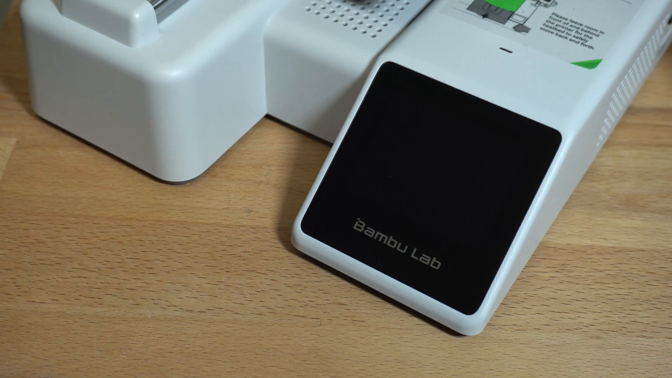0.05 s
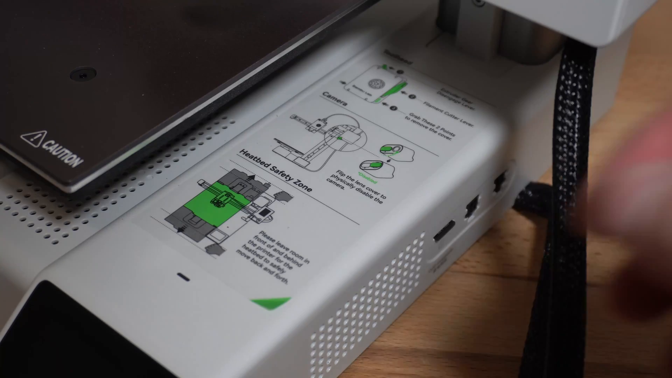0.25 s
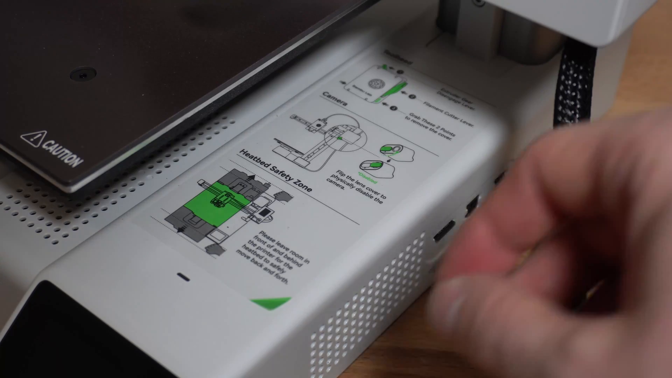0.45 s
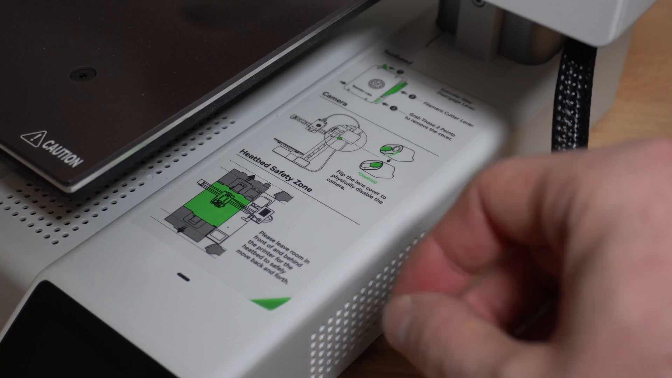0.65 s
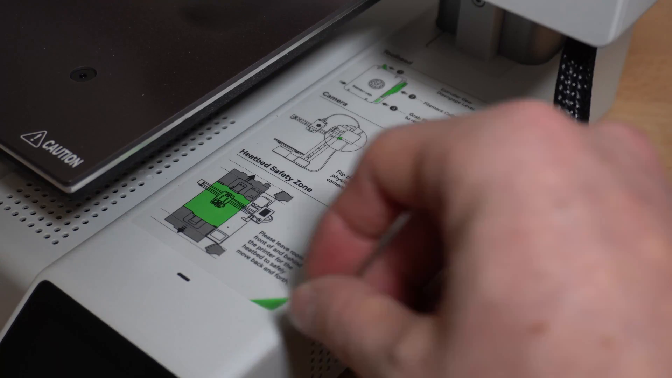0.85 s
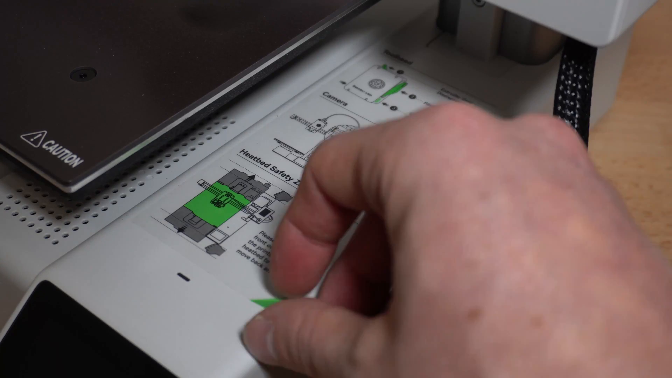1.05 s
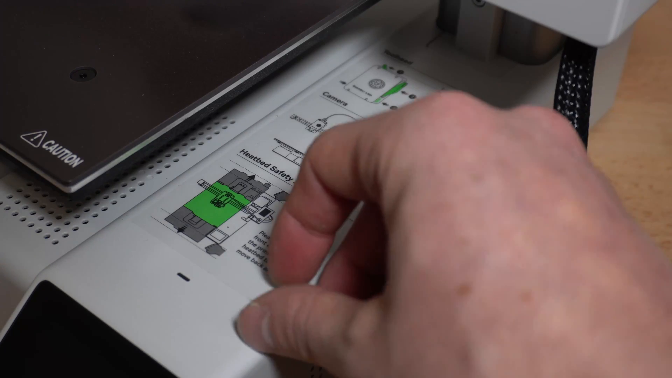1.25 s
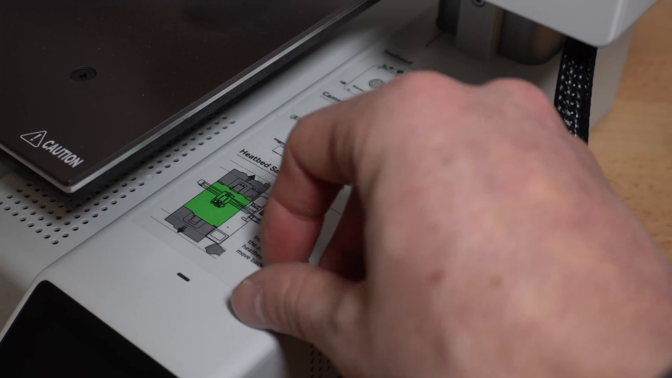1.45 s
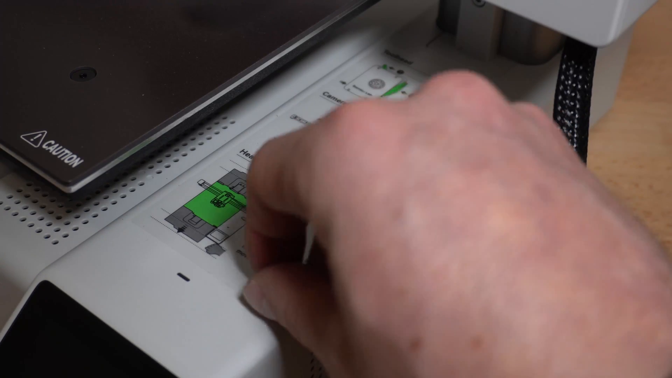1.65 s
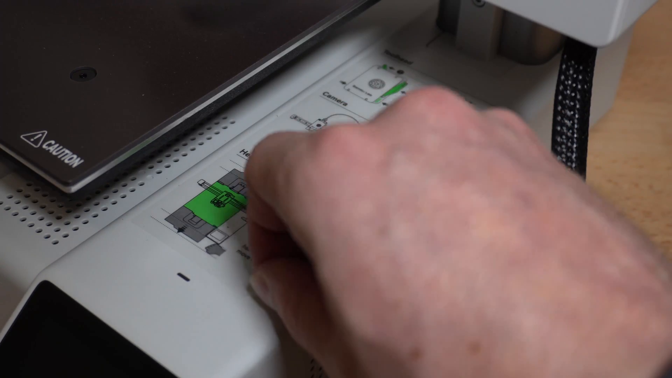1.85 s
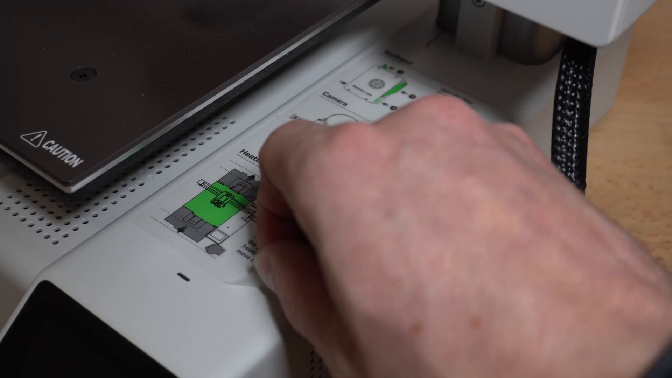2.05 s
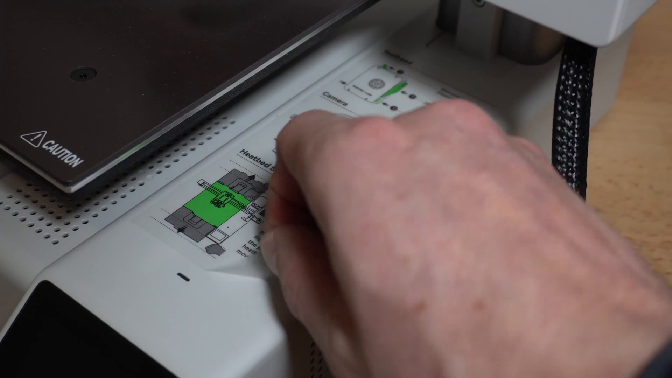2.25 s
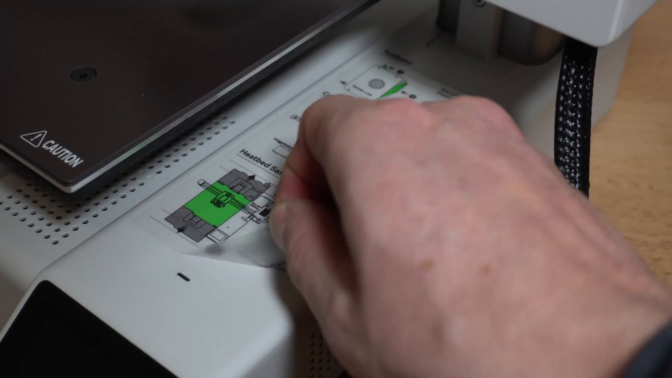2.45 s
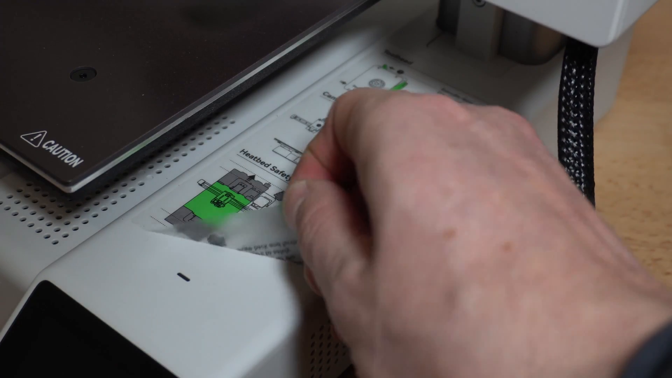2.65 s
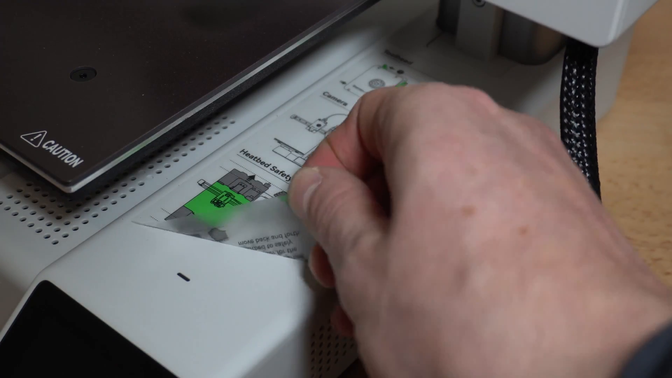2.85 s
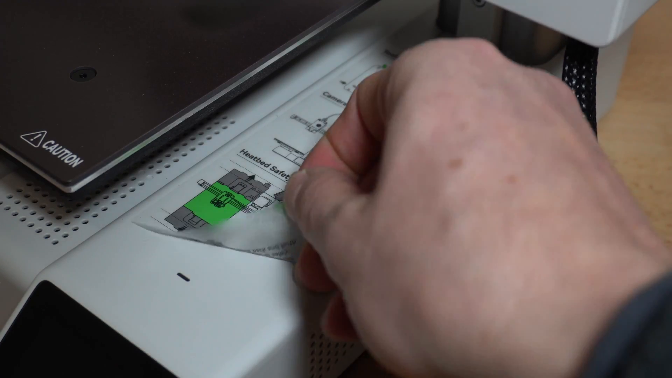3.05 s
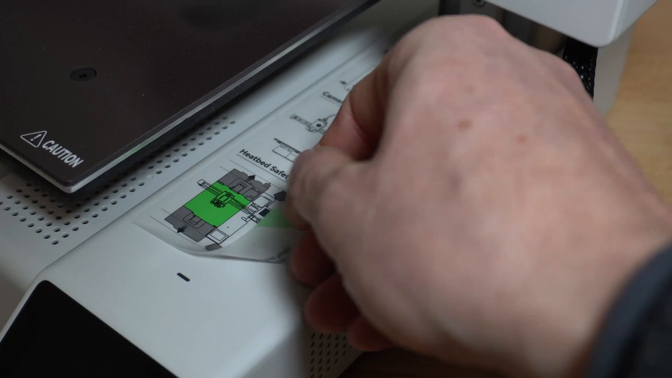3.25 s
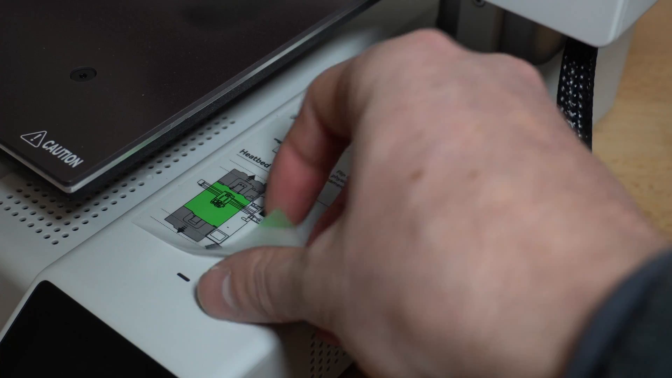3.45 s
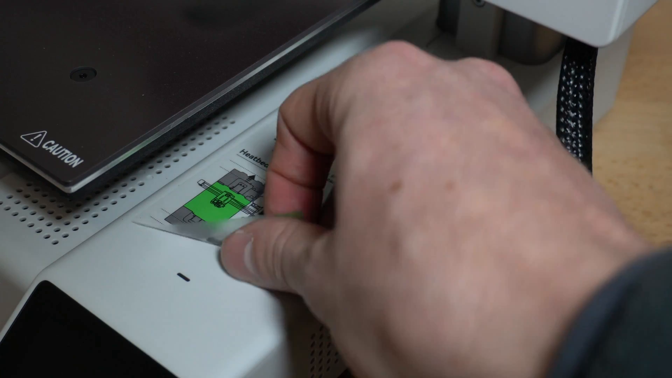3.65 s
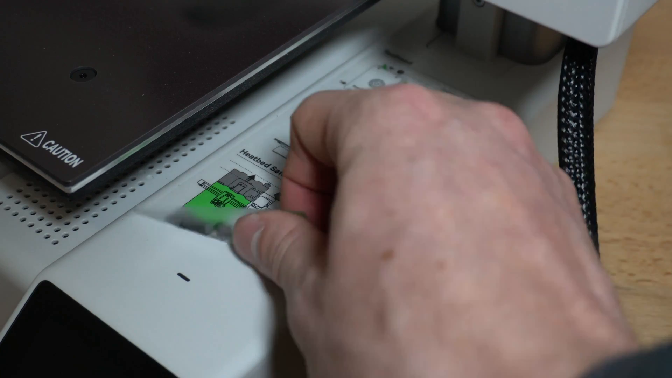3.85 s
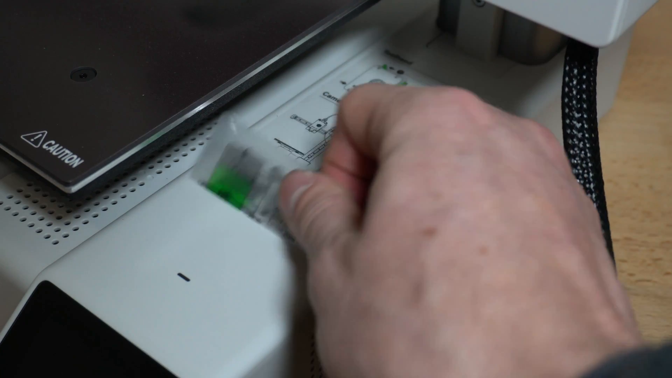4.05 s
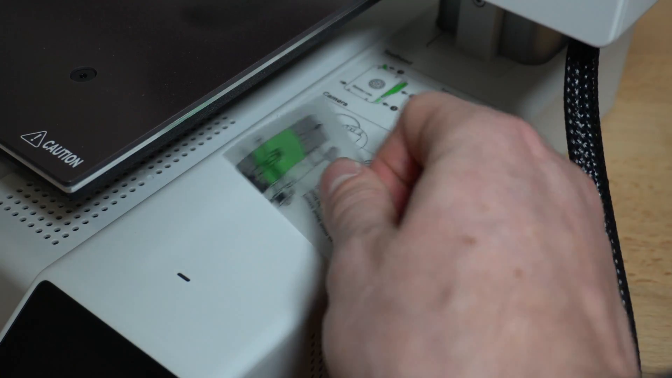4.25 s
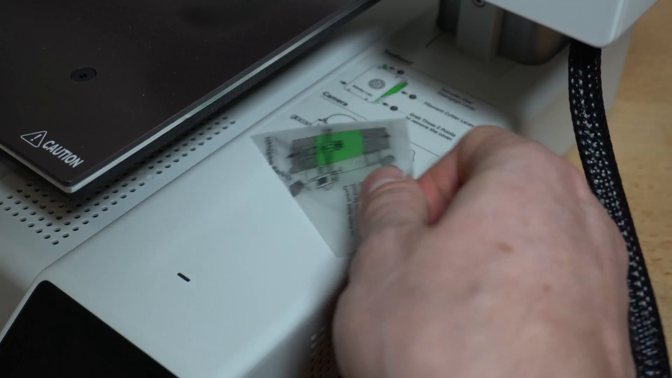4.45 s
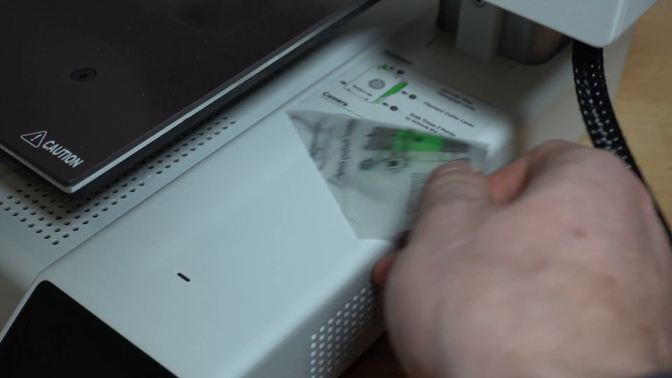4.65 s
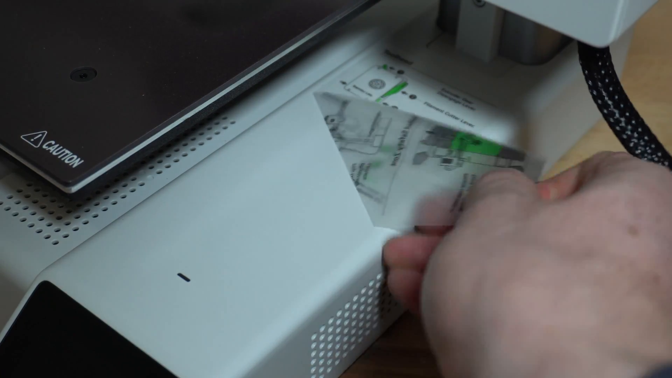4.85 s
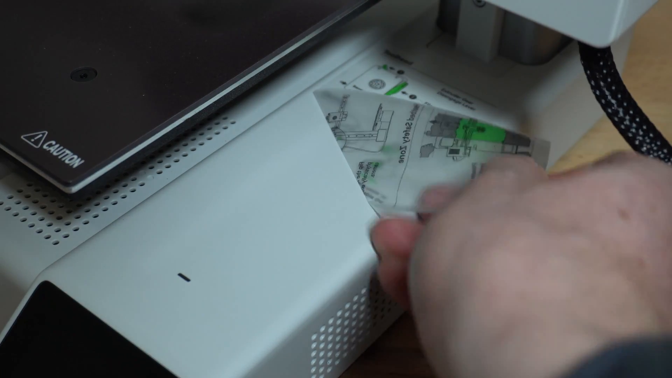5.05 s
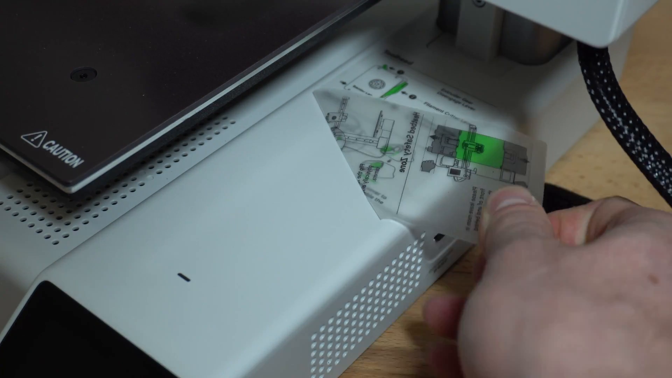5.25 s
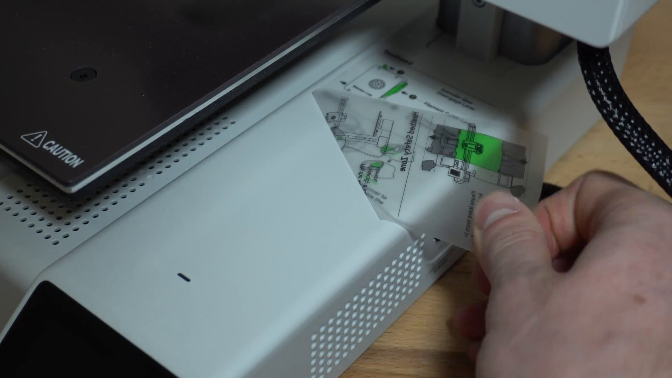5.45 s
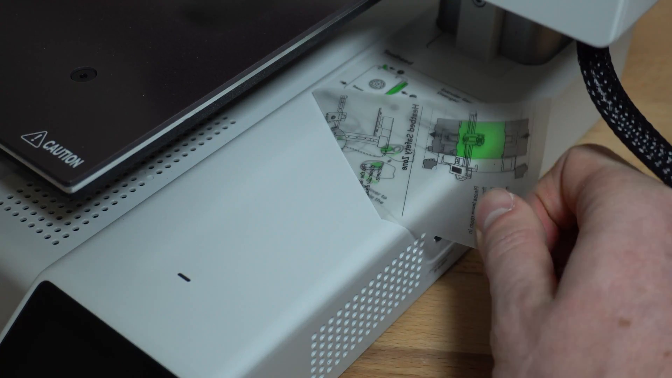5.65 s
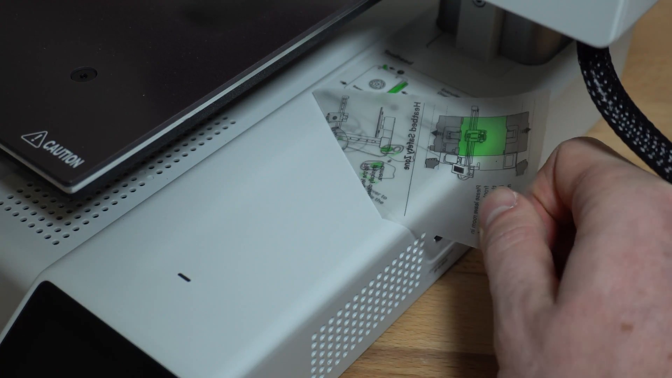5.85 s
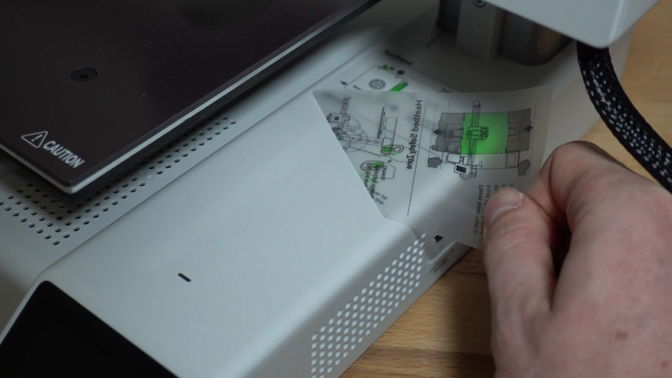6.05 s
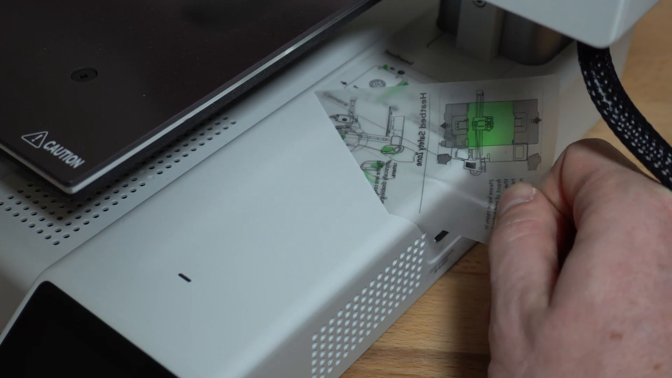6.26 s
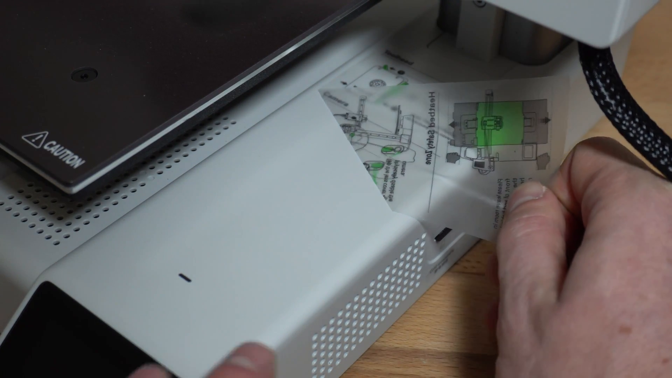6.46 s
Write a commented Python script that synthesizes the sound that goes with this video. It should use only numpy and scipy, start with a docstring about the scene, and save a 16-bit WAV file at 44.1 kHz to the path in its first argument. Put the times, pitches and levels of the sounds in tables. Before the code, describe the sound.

In a quiet small room, heard from close by, fingertips lightly scratch and knock on plastic. A stuck-on film starts to come loose with brief crinkling, followed by more soft handling. Then comes the loudest part, about a second of sticky, crackling peeling with sharp snaps and a hollow ring from the casing. Light clicks and rubbing finish it, over a faint background rumble and hiss.

```python
"""Plastic film peels off a hollow plastic casing: picked at one corner, lifted with a few crinkles, pulled.
The glue lets go in a dense crackle, the stiff film buckles in sharp snaps, and the casing rings under both.
Fingers tap and rub on the plastic. Quiet small room with faint rumble, hum and hiss."""
import sys
import numpy as np
from scipy import signal
from scipy.fft import rfft, irfft, next_fast_len
from scipy.io import wavfile

SR = 44100
rng = np.random.default_rng(int(sys.argv[2]) if len(sys.argv) > 2 else 0)


def dump(signal):
    """Clip the signal to [-1, 1] and save it as 16-bit WAV at the path in sys.argv[1]."""
    limited = np.clip(np.atleast_2d(signal).T, -1, 1)
    pcm = np.round(limited * 32767).astype(np.int16)
    wavfile.write(sys.argv[1], SR, pcm)


N = 287532
TIME_S = np.arange(N) / SR


def from_db(db):
    return 10 ** (np.asarray(db) / 20)


def unit_rms(x):
    return x / np.sqrt(np.mean(x ** 2) + 1e-20)


def add(track, time_s, sound):
    at = max(round(time_s * SR), 0)
    track[at:at + len(sound)] += sound[:max(N - at, 0)]


def at_hz(table, hz):
    """Table lookup on a log-frequency axis."""
    knots_hz, values = np.transpose(table)
    return np.interp(np.log(hz + 1), np.log(knots_hz), values)


def bandpass(x, low_hz, high_hz, order):
    sos = signal.butter(order, [low_hz, min(high_hz, .45 * SR)], "band", fs=SR, output="sos")
    return signal.sosfilt(sos, x)


def colour(x, spectrum):
    """Minimum-phase filter with the given spectrum; output rms 1."""
    size = next_fast_len(N + SR // 2, real=True) // 2 * 2
    gain = from_db(at_hz(spectrum, np.fft.rfftfreq(size, 1 / SR)))
    cepstrum = irfft(np.log(gain))
    cepstrum[1:size // 2] *= 2
    cepstrum[size // 2 + 1:] = 0
    response = np.exp(rfft(cepstrum))
    return unit_rms(irfft(rfft(x, size) * response)[:N])


def resonate(x, modes):
    """Peaks and dips in series: (frequency [Hz], width [Hz], boost [dB])."""
    for hz, width_hz, boost_db in modes:
        damping = np.pi * width_hz / SR
        tuning = -2 * np.cos(2 * np.pi * hz / SR)
        peak, dip = damping * from_db(max(boost_db, 0)), damping * from_db(max(-boost_db, 0))
        x = signal.lfilter([1 + peak, tuning, 1 - peak], [1 + dip, tuning, 1 - dip], x + 1e-18)
    return x


def flicker(rate_hz, depth_db):
    """Randomly wandering gain."""
    knots = rng.standard_normal(N // 20)
    return from_db(depth_db * np.interp(TIME_S * rate_hz, np.arange(len(knots)), knots))


def slips(rate_hz, spread_db):
    """Tiny stick-slip releases: impulses of random time, size and sign."""
    sizes = from_db(spread_db * np.minimum(rng.exponential(1, N), 3.5))
    return (rng.random(N) < rate_hz / SR) * sizes * rng.choice([-1, 1], N)


def burst(t60_s, hz, spread, order=3, rise_s=0.00025):
    """Dense modes struck at once, hz / spread to hz * spread; energy of 5 ms at rms 1."""
    t = TIME_S[:SR // 8]
    envelope = from_db(-60 * t / t60_s) * (1 - np.exp(-t / rise_s))
    ring = bandpass(rng.choice([-1, 1], len(t)) * envelope, hz / spread, hz * spread, order)
    return ring * np.sqrt(SR / 200 / np.sum(ring ** 2))


# Room noise spectrum: (frequency [Hz], relative level [dB])
AIR_SPECTRUM = [(15, -2), (28, -2), (48, -12.5), (100, -16.5), (220, -16.5), (380, -14.5), (650, -24.5),
                (1100, -23.5), (2200, -30.5), (4500, -33.5), (8000, -35.5), (16000, -36)]
# Room noise stereo image: (frequency [Hz], left-right correlation [0..1])
AIR_CORRELATION = [(30, 1), (70, 0.81), (200, 0.97), (550, 0.96), (1650, 0.98), (5000, 0.36), (15000, .05)]
def room_tone(air_db=-62, hum_db=-77, hum_hz=123.4):
    """Rumble and hum common to both sides; hiss that differs between them."""
    hz = np.fft.rfftfreq(N, 1 / SR)
    correlation = np.clip(at_hz(AIR_CORRELATION, hz), 0, 1)
    mid, side = rfft(rng.standard_normal((2, N))) * from_db(at_hz(AIR_SPECTRUM, hz))
    air = irfft(np.sqrt(1 + correlation) * mid + np.sqrt(1 - correlation) * side * [[1], [-1]], N)
    hum = np.sin(2 * np.pi * hum_hz * TIME_S)
    return from_db(air_db) * unit_rms(air) + from_db(hum_db) * unit_rms(hum)


# Contacts on the casing: (time [s], knock level [dB], knock pitch [Hz], click level [dB])
CONTACTS = [(.092, -61.5, 1000, -59.5), (.243, -50, 280, -53), (.251, -53.5, 720, -49.5),
            (0.358, -52, 290, -58), (0.402, -55.5, 300, -59), (0.679, -59, 1190, -80),
            (.732, -59, 1190, -65), (1.087, -63, 1320, -66), (1.2917, -54.5, 850, -65),
            (1.5526, -57, 700, -53.5), (2.908, -54, 810, -68), (3.035, -53, 620, -65),
            (3.0737, -55, 630, -55.5), (3.175, -45, 624, -44.5), (3.3942, -45.5, 1000, -63),
            (3.812, -43, 930, -45.5), (5.1829, -48, 434, -59), (5.356, -52.5, 470, -54.5),
            (5.376, -40, 1100, -38), (5.675, -46, 800, -45.5), (5.7608, -49.5, 810, -50),
            (6.136, -43, 520, -44)]
def taps():
    """Fingers and loose film touch the casing: click and knock, both pitched by the contact."""
    out = np.zeros(N)
    for time_s, knock_db, knock_hz, click_db in CONTACTS:
        click_hz = 2230 * (knock_hz / 745) ** 0.55
        click = from_db(click_db) * burst(t60_s=0.015, hz=click_hz, spread=1.94)
        knock = from_db(knock_db) * burst(t60_s=0.055, hz=knock_hz, spread=1.54, order=2)
        add(out, time_s, click + knock)
    return out


# Resonances of casing and taut film: (frequency [Hz], width [Hz], boost [dB])
CASING_MODES = [(322, 20.6, 10), (425.7, 80, 9.5), (514.6, 26, -11.5), (564, 30.6, 8), (641, 53.5, 6.5),
                (912, 77, 4.5), (1084, 77, 3.5), (1564, 24, 5)]
FILM_MODES = [(2220, 640, 0), (2824, 50, -5), (3540, 65, 2.5), (4330, 430, 1), (6560, 950, -2),
              (8220, 540, 4)]
def plastic_ring(x, low_hz=1186, high_hz=8930, q=290, depth_db=3.5, count=44):
    """Thin plastic rings at its main modes and many small, uneven peaks with dips between."""
    steps = np.arange(count) + rng.uniform(-0.38, 0.36, count)
    minor_hz = low_hz * (high_hz / low_hz) ** (steps / count)
    minor_modes = [(hz, hz / q, depth_db * (-1) ** k) for k, hz in enumerate(minor_hz)]
    return resonate(x, CASING_MODES + FILM_MODES + minor_modes)


def room_reverb(x, wet_db=-18, t60_s=0.38):
    """Direct sound plus dense table and wall reflections, weaker in the treble."""
    t = TIME_S[:SR // 2]
    echoes = rng.standard_normal(len(t)) * from_db(-60 * t / t60_s) * (t > .004)
    echoes = bandpass(echoes, low_hz=200, high_hz=3570, order=1)
    echoes /= np.sqrt(np.sum(echoes ** 2))
    return x + from_db(wet_db) * signal.fftconvolve(x, echoes)[:N]


# Skin friction spectra via casing and film: (frequency [Hz], relative level [dB])
RUB_CASING_SPECTRUM = [(80, -16.5), (160, -10), (240, -18), (400, -2.5), (1000, -1), (1400, 3.5),
                       (2500, -27.5)]
RUB_FILM_SPECTRUM = [(700, -11.5), (1450, 3.5), (2300, -0.5), (4000, -6), (6000, -9), (9000, -21),
                     (16000, -29.5)]
# Skin and nail slides:
# (start [s], end [s], casing level [dB], casing ring [Hz], film level [dB], film ring [Hz])
RUB_STROKES = [(0.184, 0.355, -63, 710, -62.5, 1460), (.34, 0.487, -60, 290, -67.5, 1240),
               (0.656, 1.083, -69.5, 360, -76, 1160), (1.259, 1.686, -60, 540, -71.5, 2090),
               (1.665, 1.728, -58, 605, -63, 3770), (1.731, 1.849, -55.5, 595, -56.5, 2310),
               (1.835, 1.936, -55.5, 600, -74, 3900), (2.05, 2.147, -59, 600, -58, 4100),
               (2.98, 3.3, -66, 417, -83, 2371), (3.379, 3.523, -58, 943, -59.5, 2091),
               (3.466, 3.601, -51, 960, -53, 4090), (3.571, 3.634, -72.5, 638, -50, 5970),
               (3.704, 3.815, -53, 980, -62, 2300), (5.135, 5.371, -62, 470, -67, 4190),
               (5.3, 5.707, -62.5, 441, -71, 1280), (5.503, 5.73, -69.5, 540, -60, 1796),
               (6.083, 6.418, -55, 1294, -52.5, 1360), (6.366, 6.77, -58.5, 1130, -55, 1580)]
def rubbing(casing_width_hz=100, film_width_hz=200, boost_db=10, casing_trim_db=-5, film_trim_db=-0.5):
    """Skin sticks and slips finely; each stroke swells, fades and excites two rings of the spot touched."""
    friction = slips(rate_hz=4900, spread_db=1) * flicker(rate_hz=50, depth_db=2.4)
    low, high = colour(friction, RUB_CASING_SPECTRUM), colour(friction, RUB_FILM_SPECTRUM)
    out = np.zeros(N)
    for start_s, end_s, casing_db, casing_hz, film_db, film_hz in RUB_STROKES:
        active = (TIME_S > start_s) & (TIME_S < end_s)
        progress = (TIME_S[active] - start_s) / (end_s - start_s)
        speed = np.sin(np.pi / 2 * np.interp(progress, [0, .38, 1], [0, 1, 0]))
        casing = unit_rms(resonate(low[active], [(casing_hz, casing_width_hz, boost_db)]))
        film = unit_rms(resonate(high[active], [(film_hz, film_width_hz, boost_db)]))
        out[active] += speed * from_db(casing_db + casing_trim_db) * casing
        out[active] += speed * from_db(film_db + film_trim_db) * film
    return out


# Main buckles of the film: (time [s], level [dB], pitch [Hz])
BUCKLES = [(1.9476, -51, 2970), (2.1012, -36, 4320), (2.2846, -50, 3300), (2.3477, -34, 3270),
           (2.4818, -45, 2900), (2.4917, -37, 2800), (2.4999, -33.5, 2650), (2.6189, -38, 2750),
           (2.6436, -28, 3440), (2.665, -31.5, 3800), (2.75, -34.5, 3240), (3.1731, -39, 3600),
           (3.2266, -42.5, 3170), (3.2418, -44.5, 3520), (3.8928, -38.5, 4070), (3.9057, -26, 3330),
           (3.926, -16.5, 3300), (3.9447, -22, 3760), (3.9593, -38, 3900), (3.9648, -28, 3190),
           (3.9769, -20.5, 2990), (4.0269, -24.5, 3070), (4.0548, -36, 3670), (4.0717, -24, 2790),
           (4.0913, -26.5, 3150), (4.1468, -28.5, 2830), (4.2974, -32, 3060), (4.3776, -36, 2700),
           (4.5451, -32.5, 3400), (4.5495, -32.5, 3600), (4.5759, -29.5, 3400), (4.6171, -30, 3600),
           (4.6825, -34, 3800), (4.7341, -29, 3600), (4.7447, -33, 4130), (4.8319, -38.5, 3300),
           (4.863, -40.5, 3000), (4.9307, -32.5, 3676), (4.935, -36.5, 4008), (4.9369, -22.5, 3900),
           (4.9649, -36, 3170), (5.0773, -37.5, 2900), (5.0845, -26, 3200), (5.2645, -55.5, 4040),
           (6.3868, -46, 3370)]
def film_snaps(jerks, casing_gain, typical_db=-29):
    """Stiff film flips to a new bend: bright crack, short film ring, longer casing knock."""
    out = np.zeros(N)
    for time_s, level_db, pitch_hz in BUCKLES + jerks:
        excess_db = level_db - typical_db
        crack = burst(t60_s=0.013, hz=9900, spread=1.43, order=2, rise_s=0.0001)
        crack *= from_db(-42.5 + 0.84 * excess_db)
        ring_t60_s = 0.0098 * from_db(0.41 * excess_db)
        ring = from_db(level_db - 1) * burst(ring_t60_s, pitch_hz, spread=1.655, rise_s=0.0012)
        # Taut film passes extra knock to the casing.
        taut_gain = from_db(-1.5) * np.interp(time_s, TIME_S, casing_gain)
        knock = (from_db(level_db - 11.5) + taut_gain) * burst(t60_s=0.046, hz=854, spread=1.91)
        add(out, time_s, crack + ring + knock)
    return out


# Resonance of the lifted film: (time [s], pitch [Hz])
FLAP_PITCH = [(2.8, 2600), (3.9, 2550), (4.08, 3490), (4.45, 3340), (4.7, 4650), (5.1, 3640)]
def flap_ring(x, width_hz=250, boost_db=5.5, block=256):
    """The lifted film rings at a pitch that glides with its length and tension."""
    out, state = x.copy(), np.zeros(2)
    radius = np.exp(-np.pi * width_hz / SR)
    gain = (from_db(boost_db) - 1) * (1 - radius ** 2) / 2
    pitch_hz = np.interp(TIME_S[::block], *np.transpose(FLAP_PITCH))
    for i, hz in zip(range(0, N, block), pitch_hz):
        poles = [1, -2 * radius * np.cos(2 * np.pi * hz / SR), radius ** 2]
        ring, state = signal.lfilter([1, 0, -1], poles, x[i:i + block] + 1e-18, zi=state)
        out[i:i + block] += gain * ring
    return out


# Pulls on the film: (start [s], end [s], film level [dB], casing level [dB], fall [dB/s])
HAND_PULLS = [(2.213, 2.292, -65, -62, -4), (2.286, 2.482, -52.5, -53, 64), (2.492, 2.619, -54, -55, 23),
              (2.621, 2.766, -48.5, -52, 83), (3.916, 4.134, -39, -37.5, 19.5),
              (4.151, 4.444, -44, -41.5, 13), (4.469, 4.615, -54, -48, -55), (4.629, 4.763, -33.5, -35, 17),
              (4.791, 4.927, -51.5, -43, 4), (4.923, 4.97, -45, -39.5, -4), (5.082, 5.113, -52, -43, 4)]
def pull_gains(attack_s=0.004, release_db_per_s=320):
    """Each pull builds fast, eases or grows, then lets go. Returns film and casing gains."""
    gains = np.zeros((2, N))
    for start_s, end_s, film_db, casing_db, fall_db_per_s in HAND_PULLS:
        attack = np.clip((TIME_S - start_s) / attack_s, 0, 1)
        fall_db = fall_db_per_s * np.clip(TIME_S - start_s, 0, end_s - start_s)
        fall_db += release_db_per_s * np.maximum(TIME_S - end_s, 0)
        gains = np.maximum(gains, from_db([[film_db], [casing_db]]) * attack * from_db(-fall_db))
    return gains


def glue_jerks(film_gain, gap_s=0.019, over_pull_db=4, spread_db=1.5, centre_hz=3800):
    """Glue sticks and jerks free at uneven intervals in each pull. Returns rows like BUCKLES."""
    jerks = []
    for start_s, end_s, *_ in HAND_PULLS:
        gap_scatter, level_scatter, pitch_scatter = rng.standard_normal((64, 3)).T
        times_s = start_s + np.cumsum(gap_s * np.exp(.3 * gap_scatter))
        pull_db = 20 * np.log10(np.interp(times_s, TIME_S, film_gain) + 1e-9)
        levels_db = pull_db + over_pull_db + spread_db * np.clip(level_scatter, -2, 1)
        pitches_hz = centre_hz * np.exp(.12 * pitch_scatter)
        jerks += [row for row in zip(times_s, levels_db, pitches_hz) if row[0] < end_s]
    return jerks


def glue_surge(snaps, peak_db=4.5, fall_db_per_s=419, stuck_db=-1):
    """The glue line jumps ahead at each snap, slows and sticks again. Returns a gain."""
    times_s = np.sort([0] + [time_s for time_s, *_ in snaps])
    since_snap_s = TIME_S - times_s[np.searchsorted(times_s, TIME_S, side="right") - 1]
    return from_db(np.maximum(peak_db - fall_db_per_s * since_snap_s, stuck_db))


# Glue spectra, rasp via casing and film, and ticks: (frequency [Hz], relative level [dB])
RASP_CASING_SPECTRUM = [(100, -22.5), (160, -12.5), (240, -21.5), (330, -13.5), (450, -2.5), (800, -2.5),
                        (1150, -1), (1700, -15), (3000, -45.5)]
RASP_FILM_SPECTRUM = [(700, -22.5), (1400, -8), (2200, -1), (3400, 1), (5000, -6), (6800, -11),
                      (10000, -15.5), (16000, -25.5)]
TICK_SPECTRUM = [(1000, -7), (3500, -0.5), (5500, -0.5), (8000, -13), (16000, -15.5)]
def glue_crackle(film_gain, casing_gain):
    """Glue threads break in a fine rasp that shakes film and casing; larger patches let go as ticks."""
    rasp = slips(rate_hz=2200, spread_db=5) * flicker(rate_hz=99, depth_db=0.81)
    patches = slips(rate_hz=90, spread_db=-0.5)
    ticks = signal.fftconvolve(patches, burst(t60_s=0.006, hz=4000, spread=4, order=1))[:N]
    casing = from_db(-7.5) * colour(rasp, RASP_CASING_SPECTRUM)
    film = from_db(-4) * colour(rasp, RASP_FILM_SPECTRUM) + from_db(-7) * colour(ticks, TICK_SPECTRUM)
    return casing_gain * casing + film_gain * film


def scene():
    """Peel, taps and rubs ring through the plastic, centred over stereo room tone."""
    film_gain, casing_gain = pull_gains()
    jerks = glue_jerks(film_gain)
    snaps = film_snaps(jerks, casing_gain)
    crackle = glue_surge(BUCKLES + jerks) * glue_crackle(film_gain, casing_gain)
    plastic = plastic_ring(flap_ring(snaps + crackle) + taps() + rubbing())
    return room_reverb(plastic) + room_tone()


def record(dry, cutoff_hz=16000):
    """Steep low-pass."""
    return signal.sosfilt(signal.ellip(10, .1, 70, cutoff_hz, fs=SR, output="sos"), dry)


dry = scene()
out = record(dry)
dump(out)
```